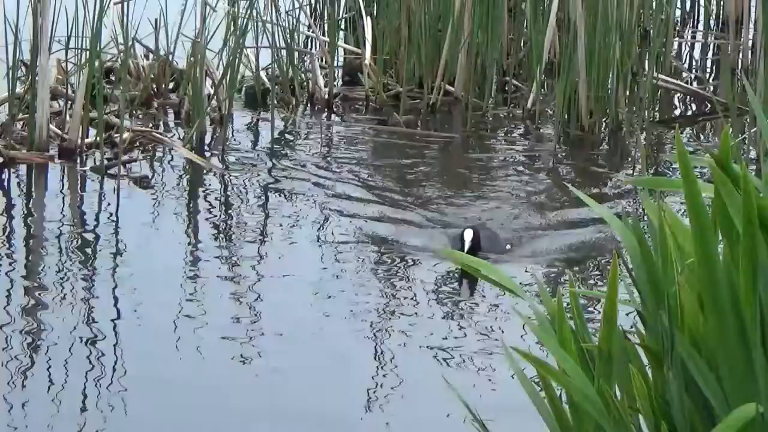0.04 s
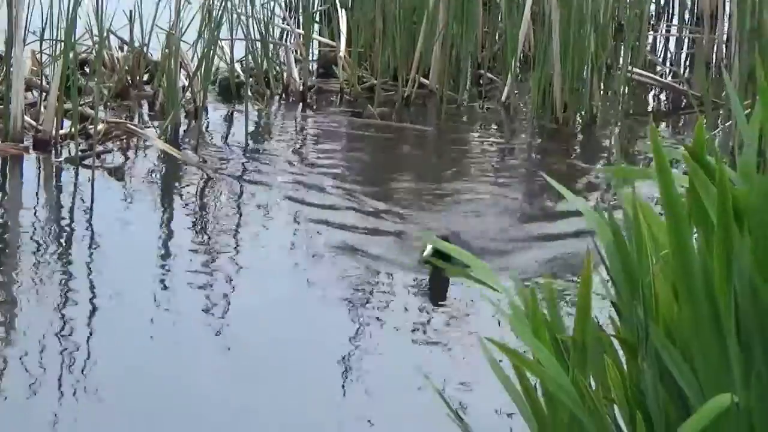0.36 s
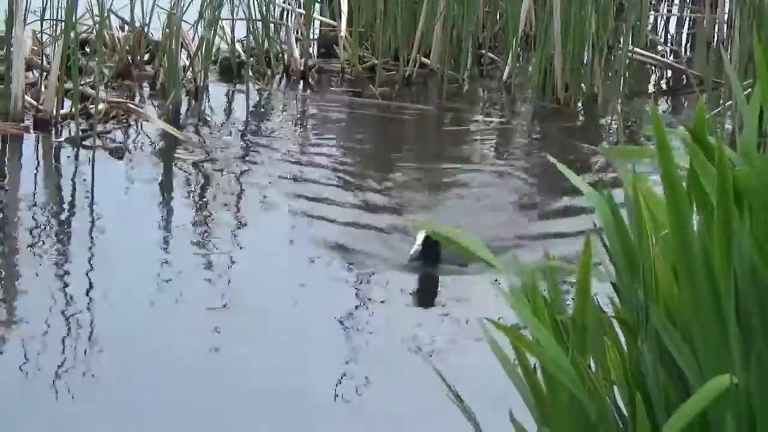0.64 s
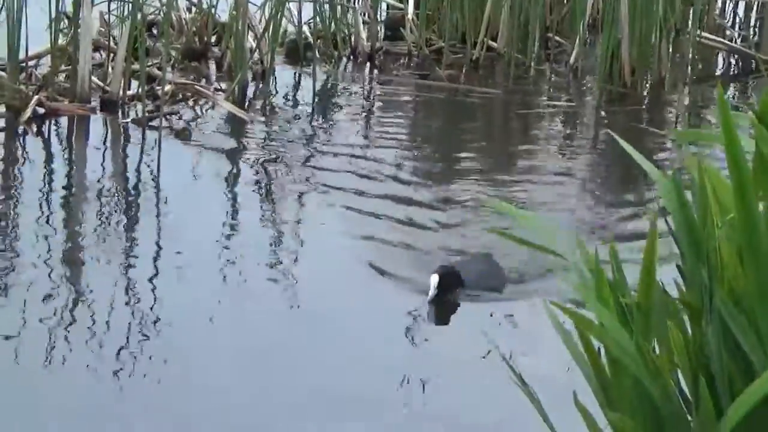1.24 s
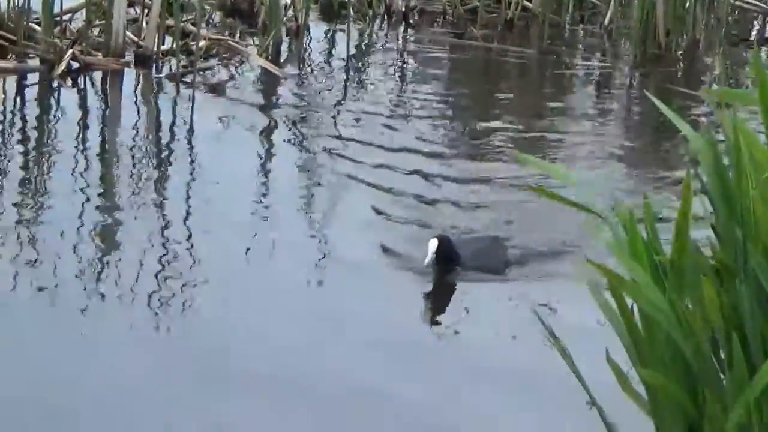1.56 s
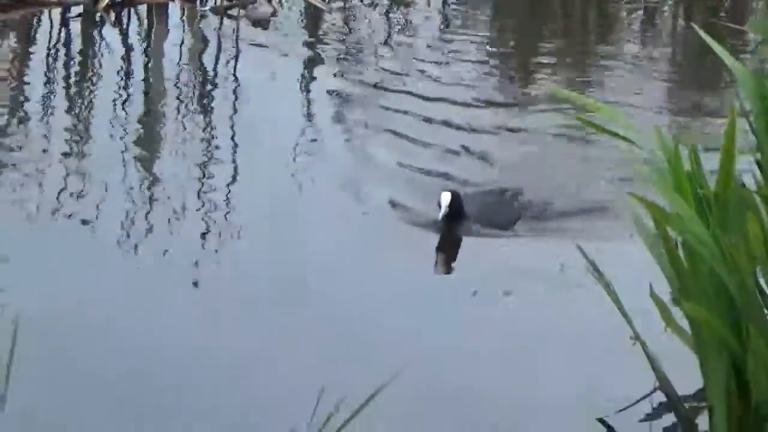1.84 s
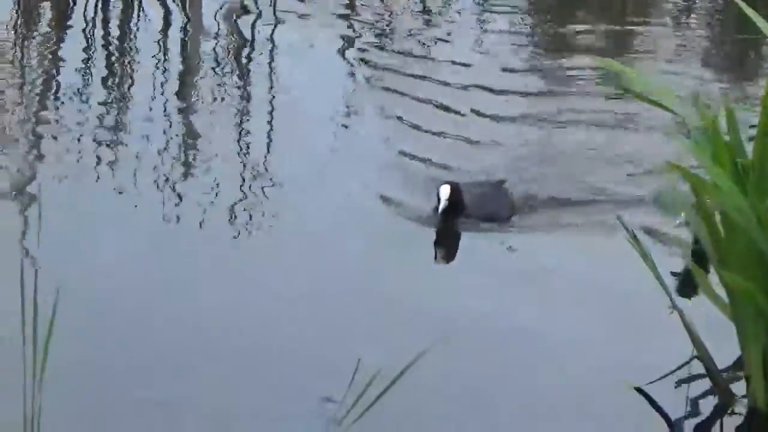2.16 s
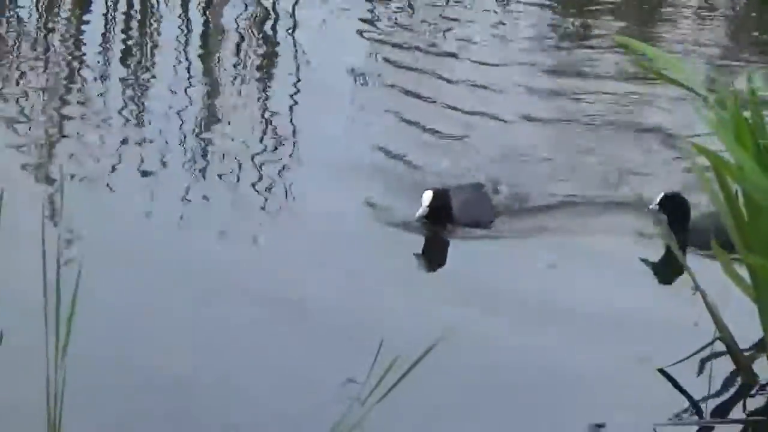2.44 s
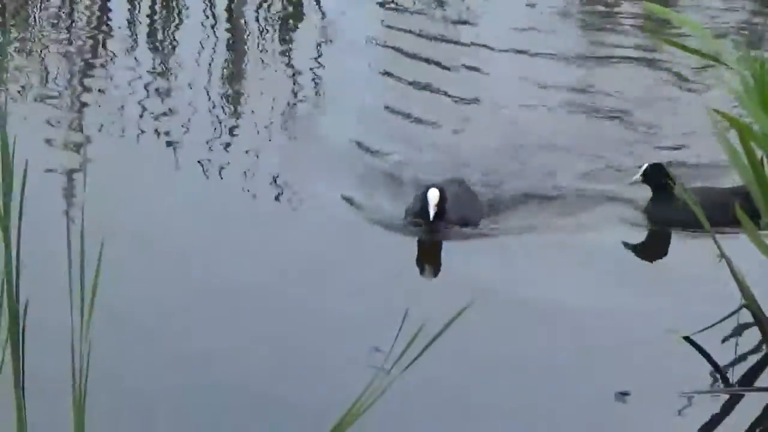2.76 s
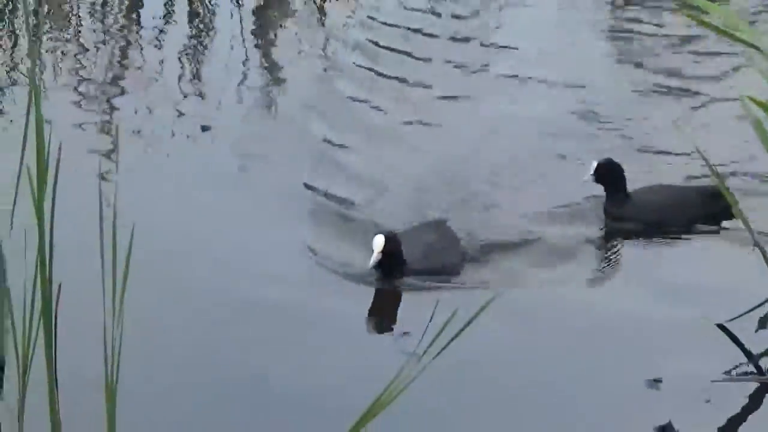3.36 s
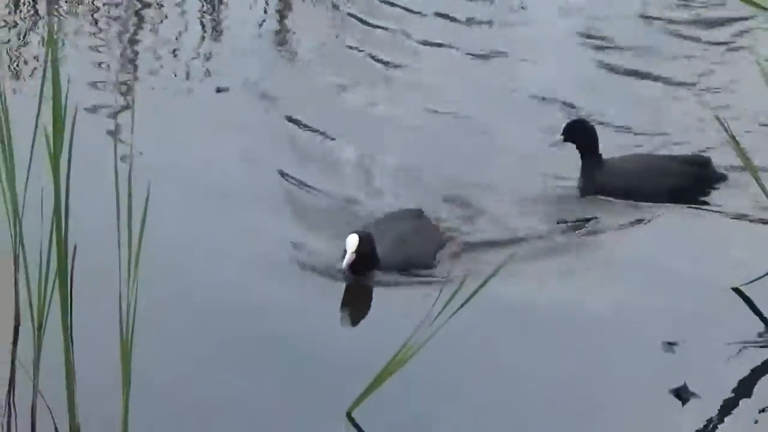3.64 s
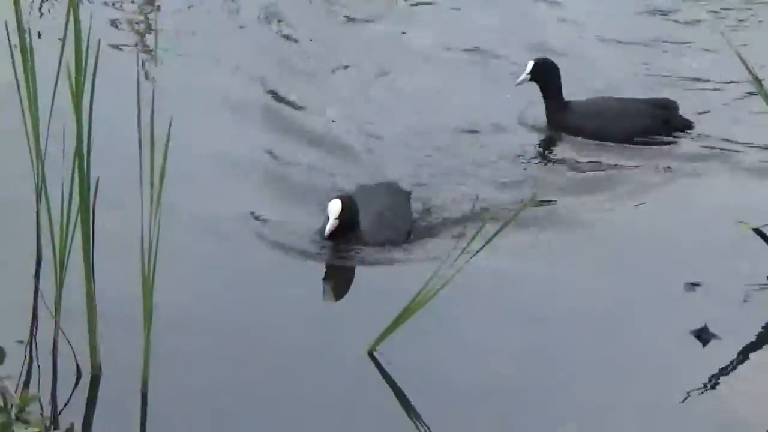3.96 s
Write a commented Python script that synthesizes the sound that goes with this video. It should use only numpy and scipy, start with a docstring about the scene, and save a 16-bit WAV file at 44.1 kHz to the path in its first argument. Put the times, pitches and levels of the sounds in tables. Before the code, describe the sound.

Quick, high chirping from a small bird sounds near the microphone, slightly left, among pond reeds. Distant birds keep whistling and trilling after it ends. Outdoor hiss and a far engine hum continue, and water plips softly near the end.

```python
"""A small bird chatters close by on the left, in quick sweeps that the reeds of a pond scatter.
Farther off, other birds twitter, whistle, warble, slur and wheeze; every note is a gliding tone.
A few dry ticks (bursts of noise) and water plips (ringing bubbles) sound nearby.
Behind it all lie a distant engine hum, a low rumble, an outdoor hiss and two soft rustles."""
import sys
import numpy as np
from scipy import signal
from scipy.fft import rfft, irfft, next_fast_len
from scipy.io import wavfile
from scipy.ndimage import uniform_filter1d, map_coordinates

SR = 44100
rng = np.random.default_rng(int(sys.argv[2]) if len(sys.argv) > 2 else 0)


def transcribe(signal):
    """Save signal, clipped to [-1, 1], as a 16-bit WAV file at the path in sys.argv[1]."""
    frames = np.atleast_2d(signal).T
    limited = np.clip(frames, -1, 1)
    pcm = np.round(limited * 32767).astype(np.int16)
    wavfile.write(sys.argv[1], SR, pcm)


N = 176400
TOP_HZ = 11250  # nothing sounds above this
NEAR_PAN_DB = 9.5  # how much louder the near bird's direct sound is on the left

# Tone colour of the fine hiss and the rustle (frequency [Hz], level [dB])
HISS_COLOUR = [(3000, -9), (5500, -7), (8200, -5), (9500, 3.5), (11000, -10)]


def amp(db):
    """Turn decibels into a number to multiply by."""
    return 10 ** (np.asarray(db) / 20)


def unit(x):
    """Scale a signal to an average (rms) level of 1."""
    return x / np.sqrt(np.mean(x ** 2) + 1e-20)


def along(points, hz):
    """Read between (frequency, value) points, with octaves evenly spaced."""
    freqs, values = np.transpose(points)
    return np.interp(np.log(hz + 1), np.log(freqs + 1), values)


def curve(rows):
    """Join (time, value) points with straight lines, one value per sample."""
    return np.interp(np.arange(N) / SR, *np.transpose(rows))


def wobble(rate, size=N):
    """A smooth curve through `rate` random values a second."""
    return map_coordinates(rng.standard_normal(8192), [np.arange(size) * rate / SR], mode="mirror")


def filtered(x, response):
    """Turn each frequency of x up or down by response(hz)."""
    n = x.shape[-1]
    padded = next_fast_len(n + 8192)
    return irfft(rfft(x, padded) * response(np.fft.rfftfreq(padded, 1 / SR)), padded)[..., :n]


def add(out, start, x):
    """Mix x into out from a start time in seconds."""
    i = max(round(start * SR), 0)
    out[:, i:i + x.shape[-1]] += x[..., :N - i]


def sides(pan_db):
    """Left and right gains; a positive pan leans left."""
    return amp(np.array([[pan_db], [-pan_db]]) / 2)


def die_away(t, rise_s, t60):
    """A quick rise, then a fade of 60 dB every t60 seconds."""
    return amp(-60 * t / t60) * (1 - np.exp(-t / rise_s))


def outdoors(x, pan_db, reeds_db, far_db):
    """Sound arrives directly, in scattered bounces off the reeds, and as a longer echo from the banks."""
    t = np.arange(SR // 2) / SR
    stems, banks = rng.standard_normal((2, 2, len(t)))
    stems *= rng.random(stems.shape) < 900 / SR  # about 900 bounces a second
    reed_echo = unit(stems * die_away(t, rise_s=.0039, t60=.15)) * sides(pan_db=8)
    bank_echo = unit(banks * die_away(t, rise_s=.0039, t60=1))
    paths = (amp(reeds_db) * reed_echo + amp(far_db) * bank_echo) / np.sqrt(len(t))
    paths[:, :1] += sides(pan_db)  # the direct sound
    return signal.fftconvolve(x[None], paths, axes=1)


def rush(colour, patchy_db):
    """Stereo noise of a given tone colour, with random louder and softer patches."""
    # How alike the two ears' signals are (frequency [Hz], likeness [0 to 1])
    likeness = [(100, 1), (300, 0.99), (700, 0.86), (4000, 0.49), (9000, 0.75)]
    grid = signal.stft(rng.standard_normal((2, N)), nperseg=512)[2]  # noise by frequency and time
    patches = uniform_filter1d(rng.standard_normal(grid.shape[1:]), size=6, axis=0)
    patches = uniform_filter1d(patches, size=14, axis=1)
    noise = signal.istft(grid * amp(patchy_db * unit(patches)), nperseg=512)[1][:, :N]

    def response(hz):
        angle = np.arccos(np.clip(along(likeness, hz), -1, 1)) / 2
        return amp(along(colour, hz)) * (hz < TOP_HZ) * [np.cos(angle), np.sin(angle)]

    mid, side = filtered(noise, response)
    return unit(np.array([mid + side, mid - side]))


def engine(base_hz=71.74, wander=.00772):
    """A far engine hums at multiples of one slightly wandering pitch."""
    # Tones in the hum (multiple of the base pitch, level [dB])
    tones = [(1, -51.5), (2, -49.5), (4, -58), (5, -59), (6, -63.5)]
    phase = 2 * np.pi * np.cumsum(base_hz * (1 + wander * wobble(8))) / SR
    return np.sqrt(2) * sum(amp(db + wobble(10)) * np.sin(k * phase + .5 * wobble(10)) for k, db in tones)


def rumble():
    """A low rumble grows louder, and the engine's hum within it grows too."""
    # Loudness of the rumble (time [s], level [dB])
    levels = [(0.3, -50.5), (1.89, -45), (3.9, -44.5)]
    # Its tone colour (frequency [Hz], level [dB])
    colour = [(25, -6.5), (45, -12), (90, -3), (180, -1), (300, -9), (430, -6.5), (600, -23.5), (1200, -39)]
    db = curve(levels)
    hum = amp(db - db.mean() - 2) * engine()
    return hum + amp(db) * rush(colour, patchy_db=1)


def air():
    """The broad rush of the open air, with a fine hiss above it."""
    # Loudness of the rush (time [s], level [dB])
    levels = [(0.3, -56.5), (1.86, -51), (3.9, -50)]
    # Its tone colour (frequency [Hz], level [dB])
    colour = [(350, -21.5), (720, 3), (2000, -4), (4600, -13), (6000, -20.5), (11000, -23.5)]
    broad = amp(curve(levels)) * rush(colour, patchy_db=2)
    hiss = amp(-75 + wobble(10)) * rush(HISS_COLOUR, patchy_db=.5)
    return broad + hiss


def rustle(fade_s=.091):
    """A fine, fluttering rustle swells, holds and fades."""
    # Spells of rustling (start [s], end [s], level [dB])
    spells = [(0.412, 0.89, -66), (2.84, 3.68, -59)]
    t = np.arange(N) / SR
    swell = sum(amp(db) * np.clip(np.minimum(t - start, end - t) / fade_s, 0, 1)
                for start, end, db in spells)
    flutter = amp(1.9 * wobble(25) + 2.8 * wobble(500) - .6)
    return swell * flutter * rush(HISS_COLOUR, patchy_db=2)


def plips(typical_hz=2066, spread=.156):
    """Each water plip is four small bubbles that ring and rise in pitch."""
    # Plips in the pond (time [s], level [dB])
    drops = [(3.552, -45), (3.725, -43), (3.888, -39.5), (3.933, -45.5)]
    out, t = np.zeros((2, N)), np.arange(SR // 10) / SR
    for start, db in drops:
        for k in range(4):
            hz = typical_hz * np.exp(spread * rng.standard_normal())
            bubble = np.sin(2 * np.pi * hz * t * (1 + 3 * t)) * die_away(t, rise_s=.00037, t60=.022)
            delay = k * rng.uniform(.00087, .004)
            add(out, start + delay, outdoors(amp(db) * bubble, pan_db=8.5, reeds_db=-10, far_db=-22))
    return out


def burst(colour, t60):
    """A short puff of noise, coloured by (frequency [Hz], level [dB]) points."""
    t = np.arange(SR // 10) / SR
    noise = filtered(rng.standard_normal(len(t)), lambda hz: amp(along(colour, hz)))
    return unit(noise) * die_away(t, rise_s=.0003, t60=t60)


def ticks():
    """Each dry tick is a bright snap over a duller knock."""
    # Nearby ticks (time [s], snap level [dB], knock level [dB])
    hits = [(0.553, -34, -39), (.682, -45, -32.5), (0.7299, -47, -36), (1.776, -43, -92),
            (3.957, -37.5, -64)]
    out = np.zeros((2, N))
    for start, snap_db, knock_db in hits:
        snap = amp(snap_db) * burst([(3000, -31), (6500, -7), (9500, -1)], t60=.031)
        knock = amp(knock_db) * burst([(350, -10), (1050, -5), (5000, -14.5), (9000, -33)], t60=.037)
        add(out, start, outdoors(snap + knock, pan_db=-1, reeds_db=-7.5, far_db=-18))
    return out


def progress(seconds):
    """Run from 0 to 1 over a note."""
    return np.linspace(0, 1, max(int(seconds * SR), 32))


def arch(u, start, middle, end):
    """A smooth bend through three pitches as u runs from 0 to 1."""
    return start + (end - start) * u + (middle - (start + end) / 2) * (1 - (2 * u - 1) ** 2)


def note(hz, rough=.0076, edge=.16):
    """A bird's tone with a weak octave above; `rough` shakes the pitch, `edge` softens both ends."""
    shaky_hz = hz * (1 + rough * wobble(1000, size=len(hz)))
    phase = 2 * np.pi * np.cumsum(shaky_hz) / SR
    swell = np.abs(np.sin(np.linspace(0, np.pi, len(hz)))) ** edge
    return np.sqrt(2) * swell * (np.sin(phase) + amp(-32.5) * np.sin(2 * phase))


def waver(tone, depth_db=2.5):
    """A far note flickers in loudness."""
    return tone * unit(amp(depth_db * wobble(70, size=len(tone))))


def wheezes(pitches_hz=(3950, 4380, 4700), db=-59):
    """A distant bird's hoarse, rising buzz, blurred by echo."""
    # When each wheeze begins (time [s])
    starts = [1.5, 2.482, 3.79]
    out = np.zeros((2, N))
    for start in starts:
        tone = note(arch(progress(seconds=.3), *pitches_hz), rough=.0583, edge=.6)
        add(out, start, outdoors(amp(db) * tone, pan_db=-11.5, reeds_db=-1, far_db=-14))
    return out


def slurs():
    """Thin, faint calls slide up to a peak and back down."""
    # Sliding calls (time [s], top pitch [Hz], level [dB])
    calls = [(.17, 4650, -63), (0.891, 6580, -66), (1.175, 5700, -65), (2.12, 5880, -68),
             (2.705, 7250, -70), (2.929, 4760, -61), (3.745, 5660, -65)]
    out = np.zeros((2, N))
    hump = .6 + .4 * np.sin(np.pi * progress(seconds=.115)) ** 2
    for start, top_hz, db in calls:
        tone = waver(note(top_hz * hump, rough=.03, edge=.2))
        add(out, start, outdoors(amp(db) * tone, pan_db=0, reeds_db=-4, far_db=-2))
    return out


def whistles():
    """Far birds whistle pure, gently bending notes."""
    # Whistled notes (time [s], length [s], first pitch [Hz], middle pitch [Hz], last pitch [Hz],
    # level [dB], left over right [dB])
    calls = [(1.297, 0.31, 2440, 2220, 2297, -58, -2), (1.513, .084, 2894, 2780, 2820, -50, 6),
             (1.859, 0.18, 2600, 2743, 2690, -61.5, -8), (2.198, 0.23, 2220, 1885, 1642, -60.5, -7),
             (2.252, .11, 3400, 3815, 3260, -53.5, -1), (2.402, 0.059, 2350, 2600, 2800, -59.5, 11),
             (2.862, .24, 1670, 2085, 2397, -56.5, 4), (3.326, .13, 2860, 3060, 2880, -63, 0),
             (3.91, 0.054, 8100, 7930, 8020, -61, 3)]
    out = np.zeros((2, N))
    for start, length, *pitches, db, pan_db in calls:
        tone = waver(note(arch(progress(length), *pitches)))
        add(out, start, outdoors(amp(db) * tone, pan_db, reeds_db=-2, far_db=-7))
    return out


def warbles(swing_hz=96, level_swing=.44):
    """Far birds trill: pitch and loudness swing quickly up and down together."""
    # Trilled notes (time [s], length [s], first pitch [Hz], middle pitch [Hz], last pitch [Hz],
    # level [dB], trill rate [Hz])
    calls = [(0.081, 0.045, 2850, 2650, 2290, -50, 83), (0.469, 0.16, 2480, 2660, 2314, -52.5, 34),
             (1.123, .11, 1977, 2434, 2790, -53.5, 38), (1.978, 0.12, 1746, 2074, 1804, -50, 82),
             (2.44, 0.12, 1800, 2102, 1817, -46, 74)]
    out = np.zeros((2, N))
    for start, length, *pitches, db, rate in calls:
        u = progress(length)
        trill = np.cos(2 * np.pi * rate * length * u)
        tone = note(arch(u, *pitches) + swing_hz * trill) * (1 + level_swing * trill)
        add(out, start, outdoors(amp(db) * waver(tone), pan_db=6, reeds_db=-5, far_db=-9))
    return out


def twitter(low_hz=3230, high_hz=4590, chips_per_s=40):
    """Tiny random chips, gliding up or down, come faintly from the reeds."""
    # Spells of twitter (start [s], end [s], top level [dB])
    spells = [(0.549, 1.483, -51), (1.598, 2.203, -56.5), (2.897, 3.4, -57.5)]
    out = np.zeros((2, N))
    slope = .2 * (progress(seconds=.014) - .5)  # steepest glide: from 10% below the pitch to 10% above
    for start, end, db in spells:
        spell = np.zeros((1, N))
        for when, pitch, glide, strength in rng.random((int((end - start) * chips_per_s), 4)):
            hz = (low_hz + (high_hz - low_hz) * pitch) * (1 + (2 * glide - 1) * slope)
            gain = amp(db + 10 * (strength - 1))
            add(spell, (end - start) * when, gain * note(hz, rough=.05, edge=.87))
        add(out, start, outdoors(spell[0], NEAR_PAN_DB / 2, reeds_db=2, far_db=0))
    return out


def chip(hz, start, db, edge, flutter_hz=115):
    """One raspy note of the near bird; the other side of its voice box adds a weak, higher tone."""
    # The chatter starts hoarse and clears (time [s], pitch shake [fraction of the pitch])
    hoarseness = [(.5, .07), (1.1, .036)]
    rough = np.interp(start, *np.transpose(hoarseness))
    voices = note(hz, rough, edge) + amp(-18) * note(1.3 * hz, rough, edge=1)
    flutter = 1 + .45 * np.cos(2 * np.pi * (flutter_hz * np.arange(len(hz)) / SR + rng.random()))
    return outdoors(amp(db) * voices * flutter, NEAR_PAN_DB, reeds_db=1.5, far_db=-2)


def chatter(upsweep_hz=(3286, 3790, 5490)):
    """The near bird opens with rising sweeps, then runs on in short falling chips."""
    # Opening sweeps (time [s], level [dB])
    upsweeps = [(0.271, -53), (0.376, -48.5), (0.473, -47)]
    # Falling chips (time [s], length [s], first pitch [Hz], last pitch [Hz], level [dB])
    falls = [(0.564, 0.031, 4500, 4050, -45), (0.645, .045, 4560, 2866, -41),
             (.744, 0.0084, 4800, 4080, -45), (0.762, 0.042, 3960, 2900, -40.5),
             (0.856, 0.011, 4960, 4070, -49), (0.879, 0.028, 3900, 3370, -46),
             (0.921, 0.021, 4260, 3370, -48), (0.968, .012, 5090, 3800, -47.5),
             (0.986, 0.037, 3890, 3297, -41), (1.073, 0.037, 3830, 3276, -46),
             (1.152, 0.028, 3950, 3530, -50), (1.192, 0.029, 4060, 3490, -48.5),
             (1.262, 0.017, 4160, 3625, -51), (1.342, 0.017, 3800, 3360, -48),
             (1.54, 0.015, 3910, 3570, -47.5), (1.589, 0.022, 3780, 3270, -48),
             (1.622, 0.032, 4650, 3430, -42), (1.696, 0.024, 3680, 3156, -39),
             (1.776, .02, 3750, 3415, -39.5), (1.828, 0.0226, 4210, 3870, -49),
             (1.855, 0.029, 4010, 3220, -39), (1.913, 0.016, 4000, 3230, -42),
             (1.989, 0.022, 3740, 3217, -39), (2.04, 0.013, 4380, 3990, -49),
             (2.061, 0.015, 4400, 3580, -48.5), (2.085, 0.021, 3780, 3180, -40),
             (2.125, 0.0135, 4100, 3700, -50.5), (2.181, 0.025, 3960, 3270, -49)]
    out = np.zeros((2, N))
    for start, db in upsweeps:
        hz = arch(progress(seconds=.035), *upsweep_hz)
        add(out, start, chip(hz, start, db, edge=.3))
    for start, length, first, last, db in falls:
        hz = last + (first - last) * (1 - progress(length)) ** 1.7  # the fall slows toward its end
        add(out, start, chip(hz, start, db, edge=.7))
    return out


def scene():
    """Everything heard from the bank of the pond."""
    background = rumble() + air() + rustle()
    birds = chatter() + twitter() + whistles() + warbles() + slurs() + wheezes()
    return background + birds + ticks() + plips()


def record(dry, silent_s=.073, fade_s=.021):
    """Fade in after a moment of silence and cut off the highest treble."""
    opening = np.clip((np.arange(N) / SR - silent_s) / fade_s, 0, 1)
    return filtered(dry * opening, lambda hz: hz < TOP_HZ)


dry = scene()
out = record(dry)
transcribe(out)
```